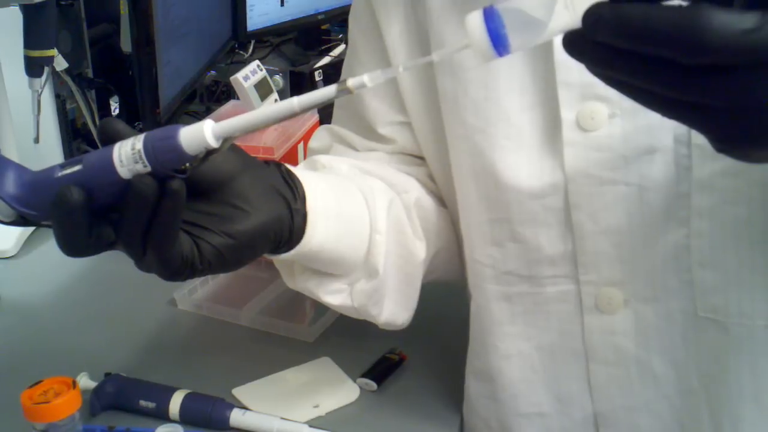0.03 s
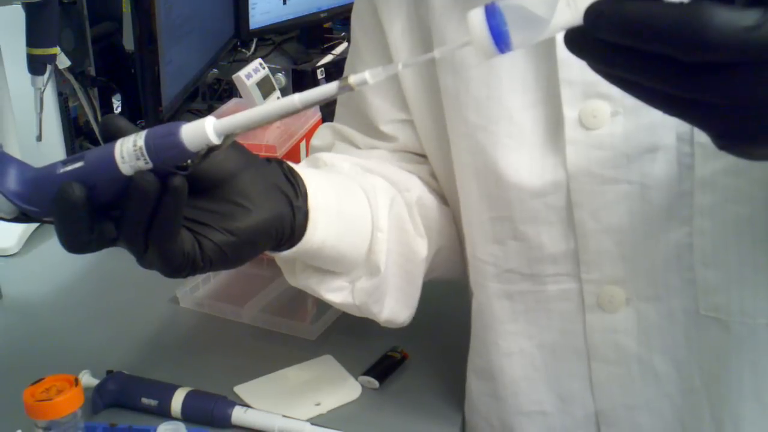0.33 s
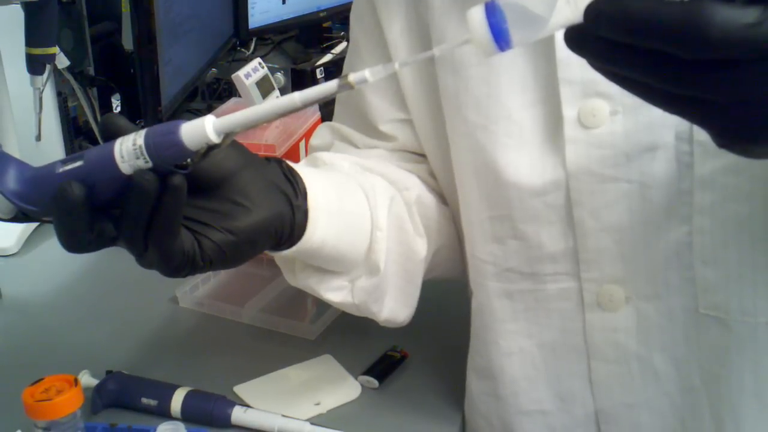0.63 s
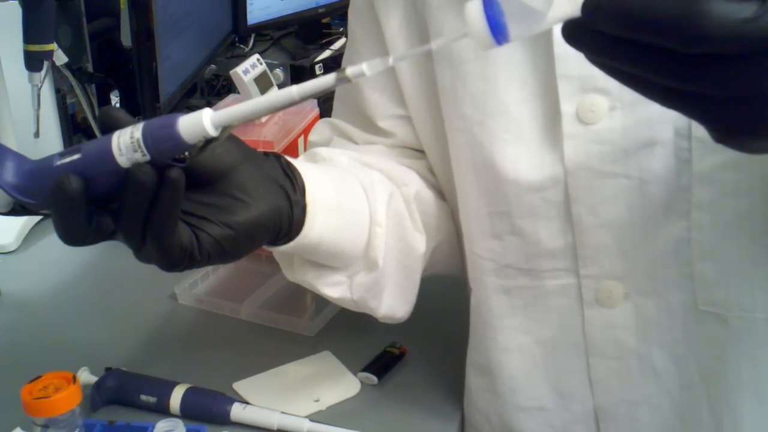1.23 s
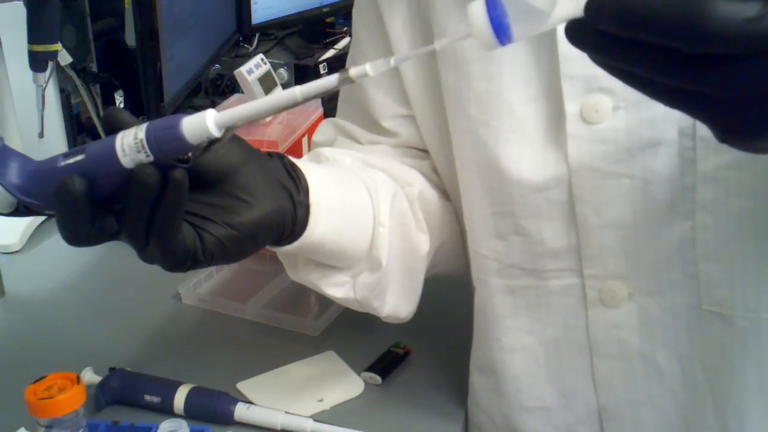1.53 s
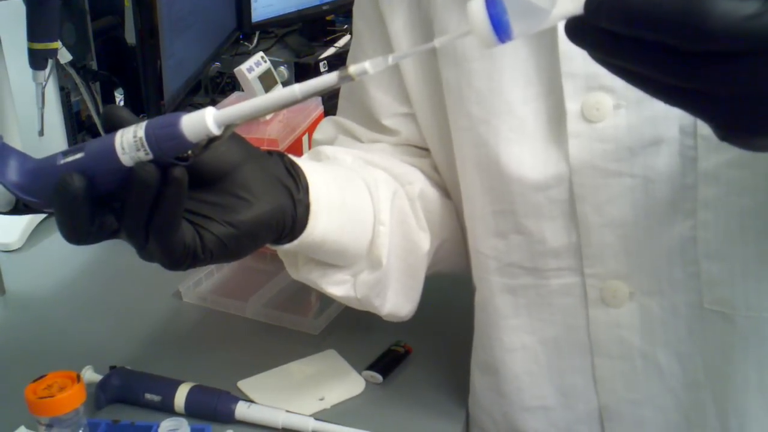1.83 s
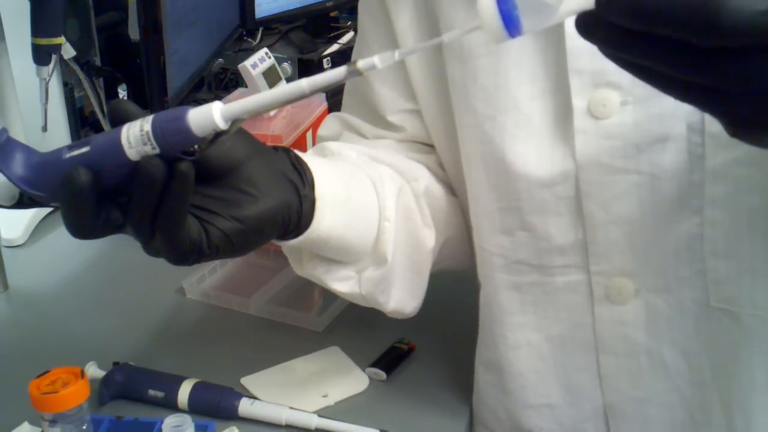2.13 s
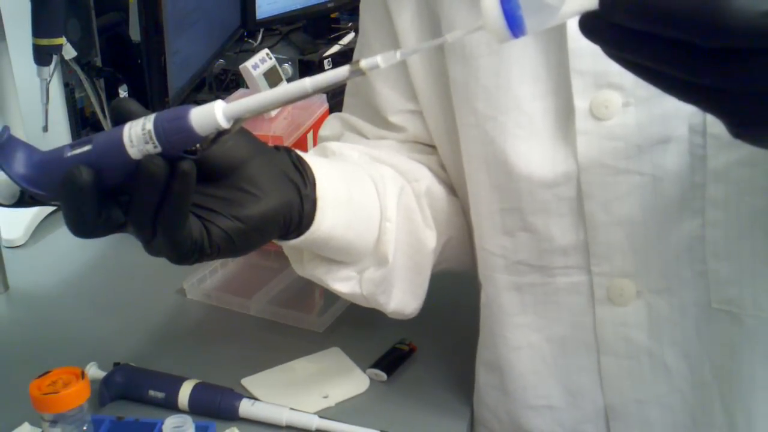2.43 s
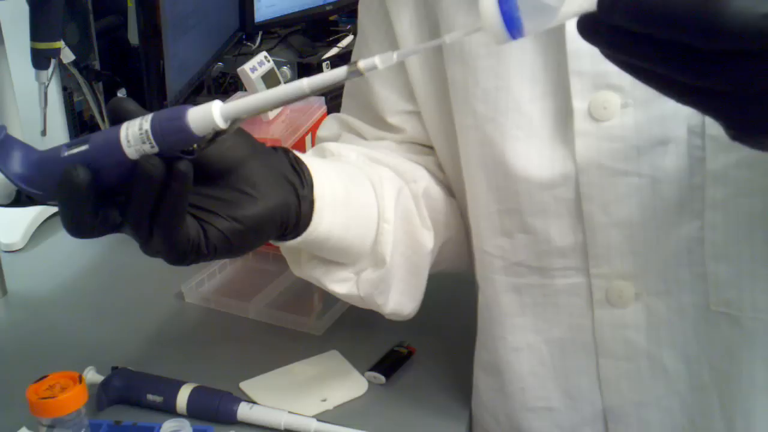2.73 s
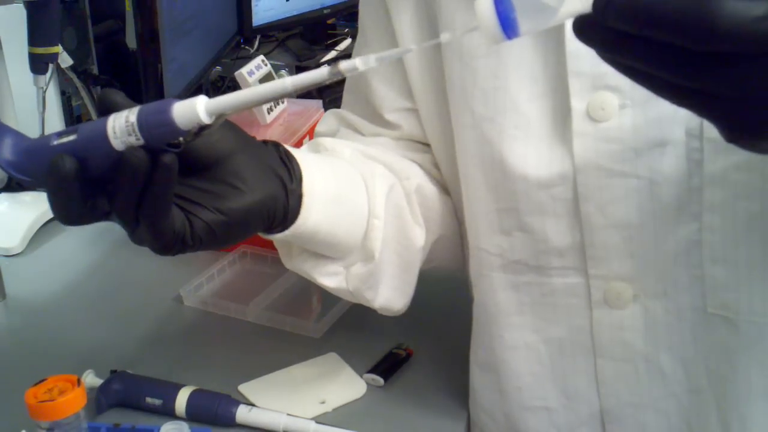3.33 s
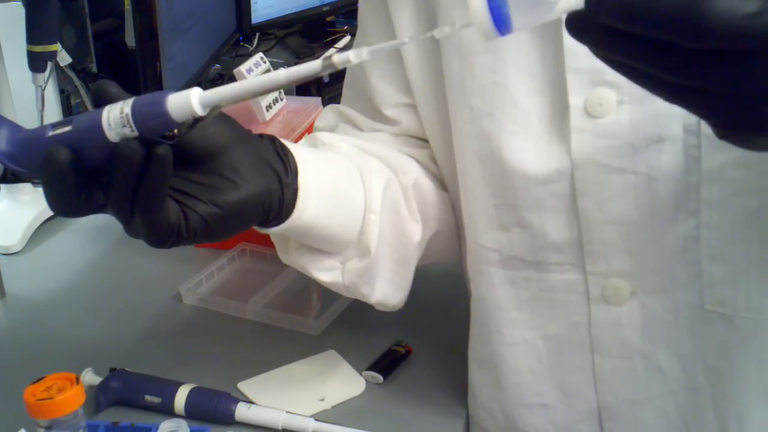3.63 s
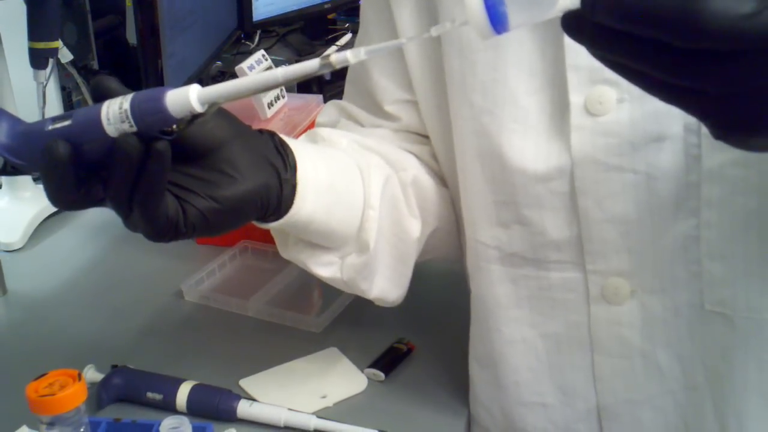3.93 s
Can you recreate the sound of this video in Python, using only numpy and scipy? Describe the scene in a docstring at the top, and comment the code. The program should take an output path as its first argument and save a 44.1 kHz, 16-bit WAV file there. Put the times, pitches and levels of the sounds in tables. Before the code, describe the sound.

A pipette click stands out, close up, over steady fan noise and motor hum in a small laboratory. A glove slides with a soft hiss through the first second. At about 2.6 seconds the plunger rubs briefly, then snaps in one quick plastic rattle with a slight room echo. Dull handling scuffs and a faint tick follow around 3.4 to 3.7 seconds, and the glove stirs faintly near 4 seconds.

```python
"""A pipette is worked close up in a small laboratory, over steady fan noise and motor hum.
A glove slides softly through the first second. At 2.6 s the plunger rubs, then snaps against its stop
in a quick rattle that rings the plastic body. Dull handling scuffs follow, a faint tick among them,
and the glove stirs again at the end. The room answers the plunger, and the scene is heard through
a pair of microphone ports."""
import sys
import numpy as np
from scipy import signal
from scipy.fft import rfft, irfft
from scipy.io import wavfile

SR = 44100
rng = np.random.default_rng(int(sys.argv[2]) if len(sys.argv) > 2 else 0)


def digitize_waveform(pressure):
    """Quantize a signal to 16-bit integers and store it at the path in sys.argv[1].

    Rows of a 2-D input are taken as channels; values are limited to [-1, 1].
    """
    field = np.atleast_2d(pressure).T
    bounded = np.clip(field, -1, 1)
    quanta = np.round(bounded * 32767).astype(np.int16)
    wavfile.write(sys.argv[1], SR, quanta)


N = 176400
T = np.arange(N) / SR
HZ = np.fft.rfftfreq(N, 1 / SR)

# strokes of the plunger rubbing before the rattle (start [s], length [s], relative level [dB])
RUB_STROKES = [(2.612, .021, -4.5), (2.633, .013, -3.5)]


def plunger():
    """Slips and snaps ring the plastic body; each snap adds a dry crack and a bright tick."""
    # snaps of the plunger, levels relative (time [s], body [dB], crack [dB], tick [dB], tick centre [Hz])
    snaps = [(2.6112, -16, -26, -11, 4100), (2.6602, -1, -1, -3, 11500), (2.6624, 1, 4, 6, 8800),
             (2.6665, 1.5, 1, 2, 8500), (2.6690, 2.5, -4, -4, 8300), (2.6780, -14, -10, -12, 6800),
             (3.3985, -26, -28, -14.5, 3500)]
    # colour of the plastic crack (frequency [Hz], density [dB per Hz])
    crack_colour = [(300, -62), (2000, -79), (2900, -85), (3700, -74), (5200, -84), (6300, -75.5),
                    (7600, -74.5), (8400, -70), (10000, -85), (14000, -78)]
    # modes of the plastic body (frequency [Hz], level [dB], t60 [s])
    body_modes = [(80, -52, .11), (172, -37.5, .11), (290, -35, .03), (400, -36, .055), (500, -31, .03),
                  (662, -40, .04), (825, -33.5, .06), (953, -46, .08), (1039, -42, .05), (1238, -45, .05),
                  (1857, -51, .05), (2110, -47, .014)]
    tick_width_hz, tick_trim_db, body_rise_s = 1800, -31.5, .0002
    t = T[:SR // 5]
    f = np.fft.rfftfreq(len(t), 1 / SR)
    blows, cracks, ticks = stick_slip(), np.zeros(N), np.zeros(N)
    for start, body_db, crack_db, tick_db, tick_hz in snaps:
        tick_band = 1 / (1 + (2 * (f - tick_hz) / tick_width_hz) ** 2)
        tick = unit_rms(shaped_noise(tick_band, len(t)))
        crack = shaped_noise(amp(curve(crack_colour, f)), len(t)) * np.sqrt(SR / 2)
        add(ticks, start, amp(tick_db + tick_trim_db) * tick * decay(t, t60=.007))
        add(cracks, start, amp(crack_db) * crack * decay(t, t60=.015))
        add(blows, start, amp([body_db]))
    ring = sum(amp(db) * decay(t, t60) * np.cos(2 * np.pi * hz * t) for hz, db, t60 in body_modes)
    body = signal.fftconvolve(blows, ring * np.minimum(t / body_rise_s, 1))[:N]
    room_send = amp(-1.5) * cracks + amp(-9) * ticks + amp(-4) * body
    direct = np.array([cracks + ticks + body, np.zeros(N)])
    return ports(direct + room(room_send), near=.72, lead=.12)


def stick_slip():
    """The rubbing plunger sticks and slips: an uneven train of tiny blows."""
    slip_hz, jitter, trim_db = 192, .05, -9.5
    slip_count = np.floor(np.cumsum(slip_hz * (1 + jitter * wander(rate_hz=160))) / SR)
    force = sum(amp(db + trim_db) * (T > start) * (T < start + length)
                for start, length, db in RUB_STROKES)
    return np.diff(slip_count, prepend=0) * force


def plunger_rub():
    """A brief, low rasp of friction as the plunger travels."""
    # colour of the rub (frequency [Hz], density [dB per Hz])
    colour = [(60, -80), (160, -66), (350, -66), (600, -76), (1200, -77), (2000, -80), (3000, -90),
              (4000, -86), (5500, -99), (9000, -96), (14000, -105)]
    return friction(RUB_STROKES, colour, t60=.065)


def scuffs():
    """Handling makes short, dull puffs of friction noise."""
    # handling strokes (start [s], length [s], level [dB])
    strokes = [(2.706, 0.0091, -7), (3.392, 0.032, -5), (3.488, .012, -16), (3.535, 0.015, -11),
               (3.678, 0.028, -2)]
    # colour of a scuff (frequency [Hz], density [dB per Hz])
    colour = [(200, -105), (600, -98), (1000, -70), (1400, -73.5), (2100, -79), (2900, -89), (3700, -91),
              (5200, -104), (8500, -104), (14000, -110)]
    return friction(strokes, colour, t60=.24)


def friction(strokes, colour, t60, attack_s=.009):
    """Soft friction noise that rises with each stroke, holds and dies away."""
    envelopes = [amp(db) * np.clip((T - start) / attack_s, 0, 1) * decay(T - start - length, t60)
                 for start, length, db in strokes]
    return ports(noise_pair(colour) * np.max(envelopes, axis=0), near=.077, lead=.62)


def glove():
    """A grainy hiss that swells as the glove slides and fades when it stops."""
    # slides of the glove (start [s], swell [s], hold [s], level [dB])
    slides = [(-.08, 0.065, 0.048, -11.5), (0.32, 0.13, 0.1, 0.5), (0.527, 0.026, .012, -7),
              (.61, .04, .03, -16), (.76, .06, .02, -14), (.88, .07, 0.027, -16), (3.88, 0.12, .02, -12)]
    # colour of the hiss (frequency [Hz], density [dB per Hz])
    colour = [(600, -100), (1600, -88.5), (2200, -90), (3000, -100), (5500, -100), (6800, -97), (8500, -88),
              (10200, -92.5), (11800, -92), (14000, -97)]
    swell_db, grain_db = 12, 2
    envelope = np.zeros(N)
    for start, swell, hold, db in slides:
        rise_db = swell_db * np.minimum((T - start) / swell - 1, 0)
        envelope += amp(db + rise_db) * decay(T - start - swell - hold, t60=.16)
    hiss = noise_pair(colour) * envelope
    grain = amp(grain_db * wander(rate_hz=260))
    return ports(hiss * grain, near=.18, lead=.97)


def motors():
    """Wavering tones of the bench equipment; neighbouring tones beat."""
    # motor tones (frequency [Hz], level [dB], left minus right [dB], left lead [rad])
    tones = [(120.6, -62, -2, -2.5), (243.1, -65, 0, 0.4), (392, -64.5, 6, 1.2), (528, -52.3, 0.5, -1.0),
             (552, -59.5, -14, -1.3), (648, -55.2, 2.6, 0.53), (672, -71, 0, 0), (969, -68, 5, -1),
             (1281, -74, 0, 0), (1516, -70, -6, -0.44), (1540, -73, 7, 3.3)]
    drift_hz, waver_db = .3, .3
    hum = np.zeros((2, N))
    for hz, db, balance_db, lead in tones:
        pitch = hz + drift_hz * wander(rate_hz=2.6)
        phase = 2 * np.pi * (np.cumsum(pitch) / SR + rng.random())
        level = amp(db + waver_db * wander(rate_hz=4.3)) * np.sqrt(2)
        hum[0] += level * amp(balance_db / 2) * np.sin(phase)
        hum[1] += level * amp(-balance_db / 2) * np.sin(phase - lead)
    return hum


def ventilation():
    """A steady bed of fan noise that flutters a little."""
    # colour of the moving air (frequency [Hz], density [dB per Hz])
    colour = [(20, -101), (40, -105), (62, -93), (90, -87.5), (130, -73), (250, -74.5), (370, -75),
              (480, -79.5), (600, -83), (740, -82), (840, -82), (970, -80.5), (1100, -84.5), (1350, -86.5),
              (1700, -90.5), (2200, -92.5), (3000, -96), (3900, -100), (5200, -108.5), (6800, -105.5),
              (8600, -104.3), (11000, -106.8), (14000, -106.5)]
    flutter_db = .23
    return ports(noise_pair(colour) * amp(flutter_db * wander(rate_hz=10)), near=0, lead=.04)


def room(send):
    """Early reflections off the bench, then a diffuse tail; two unrelated returns."""
    # decay of the room (frequency [Hz], t60 [s])
    decay_times = [(150, 0.4), (600, 0.3), (2000, 0.48), (4000, 0.3), (9000, 0.21), (14000, 0.16)]
    tail_db, early_db, reflections_per_s = -3.3, -12, 900
    t = T[:SR // 2]
    shape = (2, len(t))
    hz, frame_s, bands = signal.stft(rng.standard_normal(shape), SR, nperseg=256)
    bands *= decay(frame_s, curve(decay_times, hz)[:, None])
    tail = signal.istft(bands, SR, nperseg=256)[1][:, :len(t)]
    tail *= np.minimum(t / .004, 1)  # 4 ms fade-in
    early = rng.standard_normal(shape) * (rng.random(shape) < reflections_per_s / SR)
    early *= (t > .002) & (t < .012)
    early /= np.linalg.norm(early, axis=1, keepdims=True) + 1e-9
    response = amp(tail_db) * tail / np.linalg.norm(tail[0]) + amp(early_db) * early
    return signal.fftconvolve(send[None], response, axes=1)[:, :N]


def ports(pair, near, lead):
    """Blends two unrelated signals into ports that swing in and out of phase up the spectrum."""
    # likeness of the two ports for room sound (frequency [Hz], share [0-1])
    room_likeness = [(30, .7), (130, .52), (300, .54), (600, .68), (900, .8), (1300, .98), (2500, 1),
                     (3900, 1), (5200, .52), (6500, .42), (9000, .3), (13500, .42)]
    # phase between the ports in the bass (frequency [Hz], left lead [rad])
    bass_phase = [(60, -3), (110, -2.1), (160, -1), (220, -.9), (350, -.2), (1000, -.05), (1300, 0)]
    period_hz = 2640
    turn = 2 * np.pi * np.maximum(HZ / period_hz - .5, 0)
    swing = np.clip(1.04 * np.cos(turn), -1, 1)
    likeness = curve(room_likeness, HZ)
    likeness += (1 - likeness) * near  # a near source reaches both ports more alike
    quadrature = lead * np.sign(np.sin(turn)) * np.sqrt(1 - swing ** 2)
    coherence = likeness * (swing + 1j * quadrature) * np.exp(1j * curve(bass_phase, HZ))
    left, unrelated = rfft(pair)
    right = coherence.conj() * left + np.sqrt(np.maximum(1 - abs(coherence) ** 2, 0)) * unrelated
    return irfft(np.array([left, right]), N)


def noise_pair(colour):
    """Two unrelated noises of the given colour."""
    return shaped_noise(amp(curve(colour, HZ)), (2, N)) * np.sqrt(SR / 2)


def shaped_noise(gains, shape):
    """White noise filtered by a gain for each frequency."""
    return irfft(rfft(rng.standard_normal(shape)) * gains)


def wander(rate_hz):
    """Smooth random motion of rms 1."""
    return unit_rms(shaped_noise(np.exp(-(HZ / rate_hz) ** 2) * (HZ > 0), N))


def decay(t, t60):
    """Full level before zero, then a fall of 60 dB every t60 seconds."""
    return np.exp(-np.log(1000) * np.maximum(t, 0) / t60)


def curve(points, hz):
    """Reads a table on a log-frequency axis."""
    f, value = np.transpose(points)
    return np.interp(np.log(hz + 1), np.log(f + 1), value)


def amp(db):
    """Decibels to gain."""
    return 10 ** (np.asarray(db) / 20)


def unit_rms(x):
    """Scales to rms 1."""
    return x / np.sqrt(np.mean(x ** 2) + 1e-20)


def add(mix, start_s, sound):
    """Mixes a sound in at a time."""
    part = mix[round(start_s * SR):][:len(sound)]
    part += sound[:len(part)]


def scene():
    """The pipette sits slightly to the right, in front of the fan noise and hum."""
    pipette = (plunger() + plunger_rub()) * amp([[-1.5], [1.5]])
    return pipette + scuffs() + ventilation() + motors() + glove()


def record(dry):
    """A steep low-pass takes off the top of the treble."""
    cutoff_hz = 13980
    lowpass = signal.firwin(701, cutoff_hz, window=("kaiser", 8), fs=SR)
    return signal.oaconvolve(dry, lowpass[None], "same")


dry = scene()
out = record(dry)
digitize_waveform(out)
```